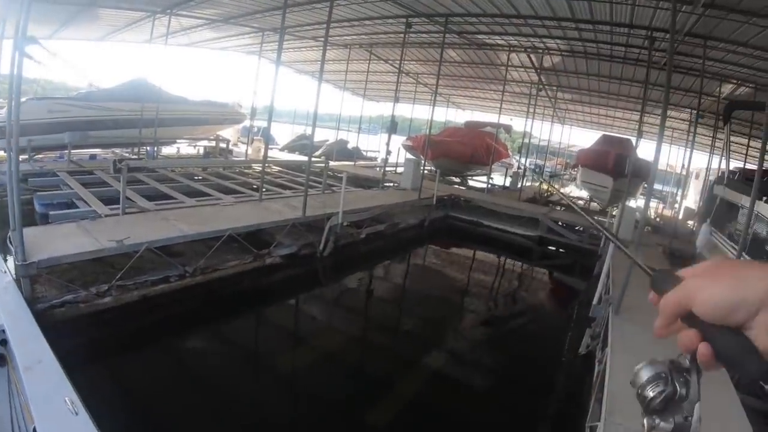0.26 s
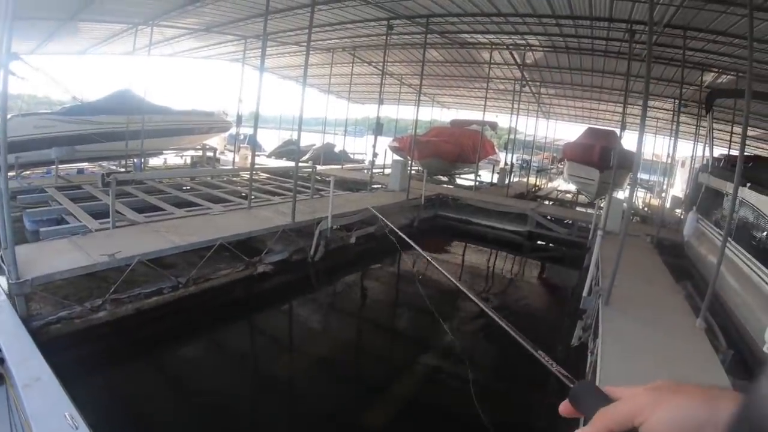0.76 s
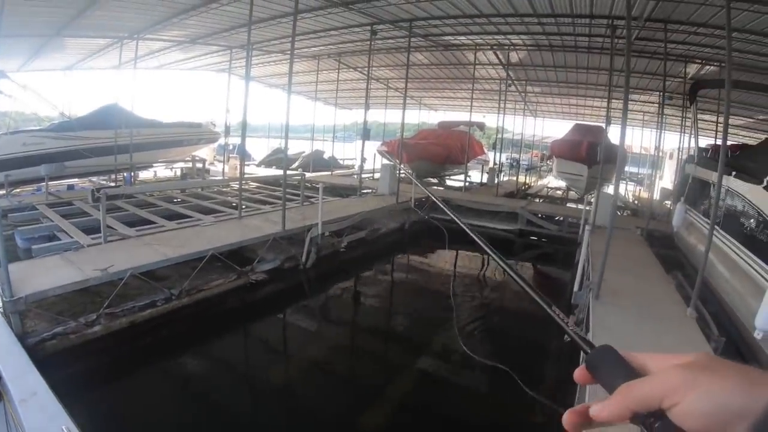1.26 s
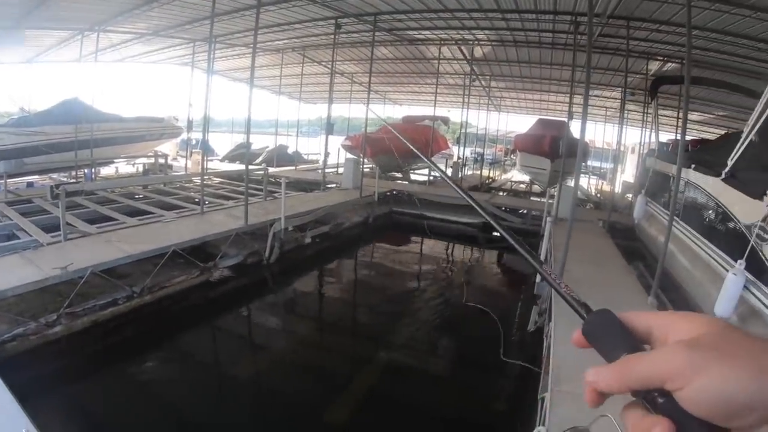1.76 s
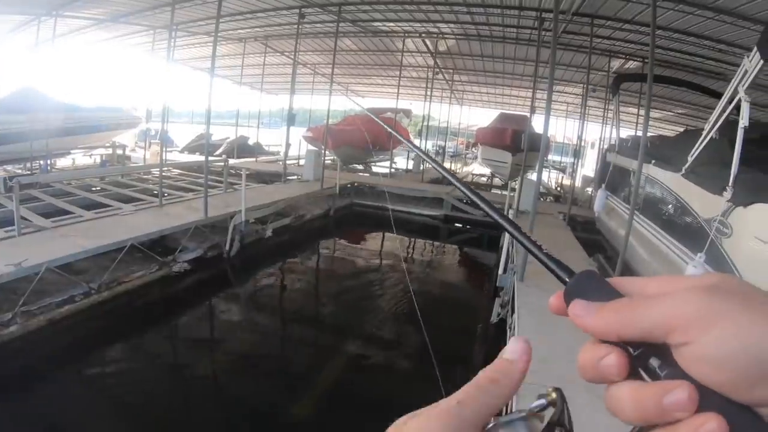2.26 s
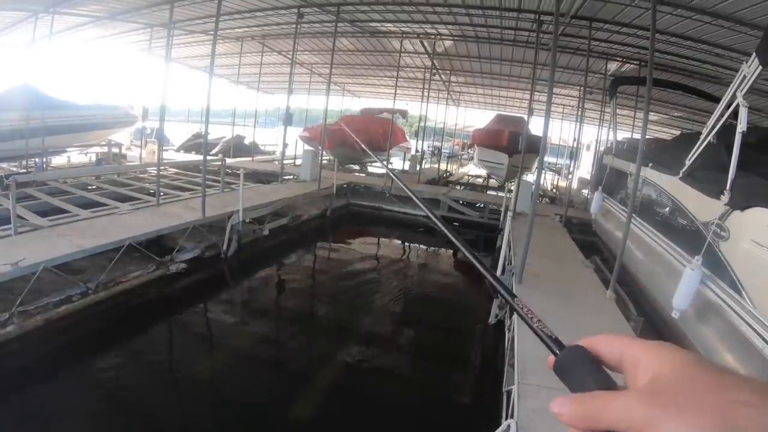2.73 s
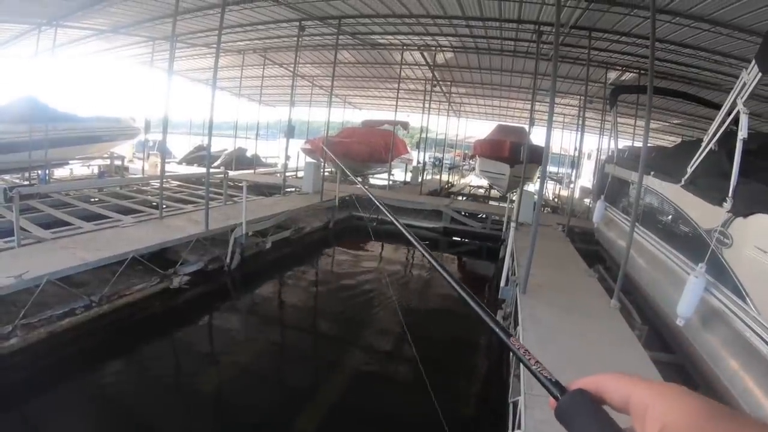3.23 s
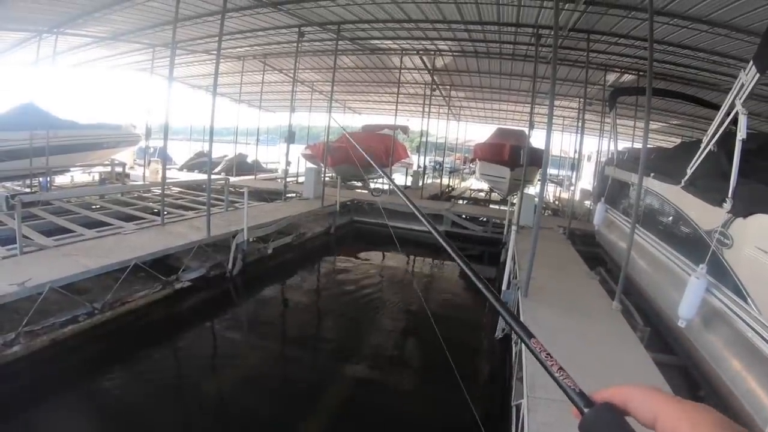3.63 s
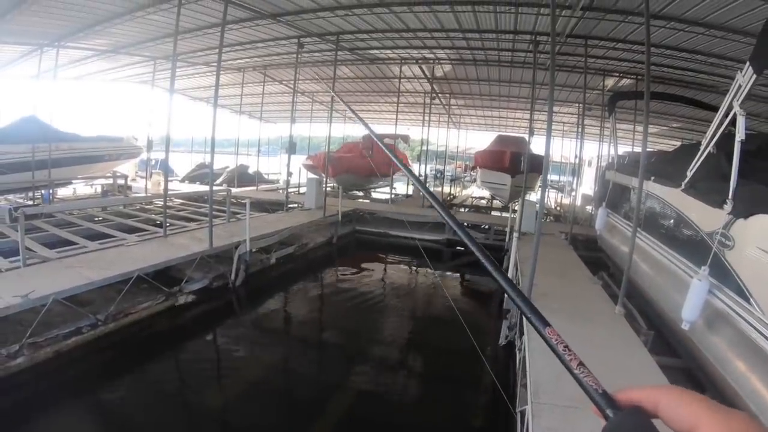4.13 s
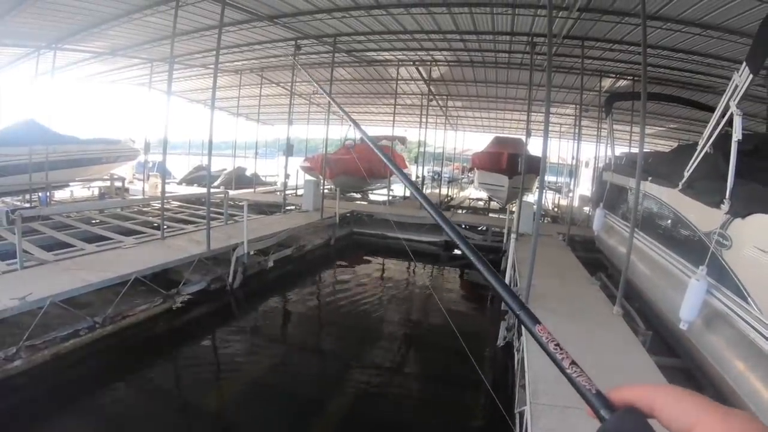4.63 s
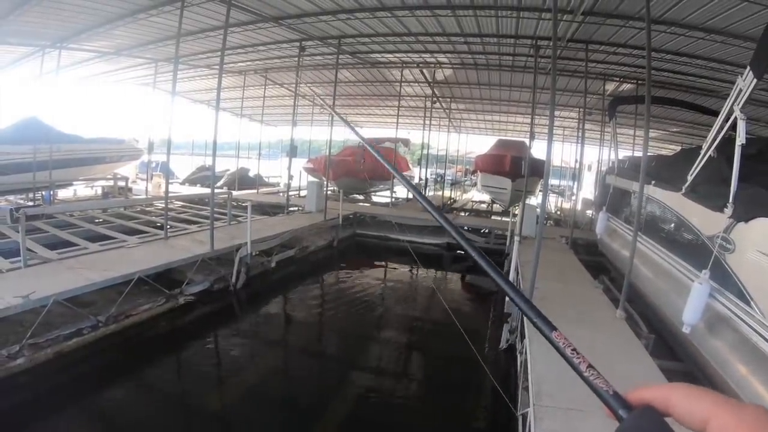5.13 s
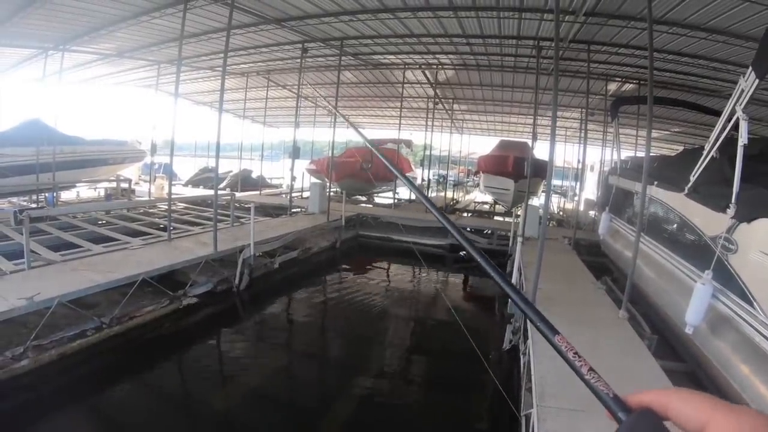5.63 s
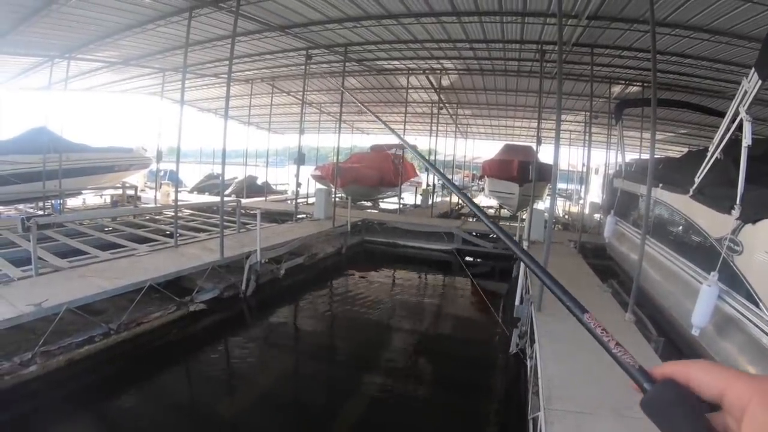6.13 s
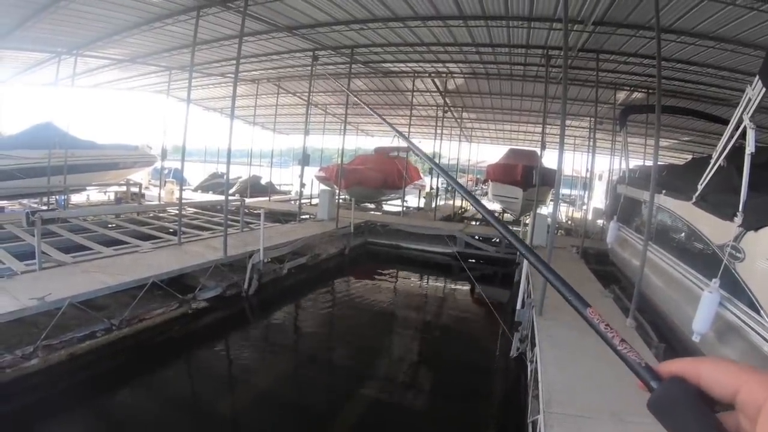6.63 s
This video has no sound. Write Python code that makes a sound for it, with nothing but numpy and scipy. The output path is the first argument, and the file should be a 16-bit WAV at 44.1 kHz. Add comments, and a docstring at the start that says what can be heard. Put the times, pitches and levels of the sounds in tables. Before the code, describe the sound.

Close handling of a fishing rod at a covered boat dock: scattered case knocks and cloth hiss, near-quiet murmur, sudden clatter, then metallic bail clack and brief whirr.

```python
"""An angler handles a spinning rod under the metal roof of a boat dock, with the camera worn on the chest.
A low murmur of the marina, coloured noise, runs throughout; faint high whistles, wavering tones, come and go.
Early on the grip creaks, a falling resonance; knocks ring the case in modes; low thumps and lurches rumble.
Sleeve and arm rub over the case as hissing noise in between, and a flurry of knocks follows past five seconds.
After some dull rubbing, coloured noise, the reel's bail scrapes and snaps shut in ringing modes and the crank whirrs."""
import sys
import numpy as np
from scipy import signal
from scipy.fft import rfft, irfft
from scipy.io import wavfile

SR = 44100
rng = np.random.default_rng(int(sys.argv[2]) if len(sys.argv) > 2 else 0)


def generate_wav(sig):
    """Save sig (samples, or channels by samples) to the path in sys.argv[1] as 16-bit PCM at SR."""
    pcm = np.round(np.clip(np.atleast_2d(sig).T, -1, 1) * 32767).astype(np.int16)
    wavfile.write(sys.argv[1], SR, pcm)


N = 303849
TIME = np.arange(N) / SR  # s
AFTER = np.arange(12000) / SR  # s since a blow

# Modes of the camera case: the mount's flex, five of the walls, two of the frame.
# Each row: frequency in Hz, relative level in dB, t60 in s at looseness 1; each blow varies them a little.
CASE_MODES = [(291, -11.5, 0.009), (1003, -3.5, 0.015), (1184, -6, 0.018), (1340, 0.5, 0.022),
              (1584, -5.5, 0.018), (1838, -11, 0.021), (2245, 19.5, 0.011), (2433, -7.5, 0.025)]
# harder contacts are brighter: the treble starts here, and this level leaves a sleeve stroke's treble as it is
BRIGHT_HZ, BRIGHT_PIVOT_DB = 4900, -34
TICK_TOP_HZ = 3100  # low-pass of the case's ticks and its singing wall
SWISH_RISE_DB_PER_S, SWISH_FALL_DB_PER_S = 748.5, 2998


def gain_of(db):
    """Decibels to amplitude."""
    return 10 ** (np.asarray(db) / 20)


def evened(x):
    """Scales to an rms of 1."""
    return x / np.sqrt(np.mean(x ** 2) + 1e-20)


def struck(x, db):
    """Sets the rms level of the first 8 ms of a blow."""
    return gain_of(db) * x / np.sqrt(np.mean(x[:, :353] ** 2) + 1e-20)


def read(points, hz):
    """Reads a spectrum on a log-frequency axis."""
    f, value = np.transpose(points)
    return np.interp(np.log(hz + 1), np.log(f + 1), value)


def add(mix, s, sound):
    """Mixes a stereo sound in at time s."""
    part = mix[:, max(round(s * SR), 0):][:, :sound.shape[1]]
    part += sound[:, :part.shape[1]]


def sides(pan_db):
    """Left and right gains of constant power; positive leans left."""
    return evened(gain_of(np.array([[pan_db], [-pan_db]]) / 2))


def wander(rate_hz):
    """Slow random motion of rms 1: noise with little above rate_hz."""
    hz = np.fft.rfftfreq(N, 1 / SR)
    spectrum = rfft(rng.standard_normal(N)) / (1 + (hz / rate_hz) ** 4)
    return evened(irfft(spectrum, N))


def lumps(rate_hz, depth_db):
    """An uneven gain that never strays more than depth_db from 0 dB."""
    return gain_of(depth_db * np.tanh(wander(rate_hz)))


def coloured(x, colour):
    """Gives a stereo excitation a spectrum, at rms 1."""
    size = x.shape[1]
    colour_gain = gain_of(read(colour, np.fft.rfftfreq(size, 1 / SR)))
    return evened(irfft(rfft(x) * colour_gain, size))


def pair(likeness, size=N):
    """White noise at the two microphone ports; a negative likeness moves them against each other."""
    a, b = rng.standard_normal((2, size))
    c = np.clip(likeness, -1, 1)
    return np.array([a, c * a + np.sqrt(1 - c * c) * b])


def highpassed(x, hz):
    """Removes what lies under an object's lowest mode."""
    return signal.sosfilt(signal.butter(2, hz, "high", fs=SR, output="sos"), x)


def brightened(x, force):
    """Harder contacts carry more treble: force is its gain."""
    treble = signal.sosfiltfilt(signal.butter(2, BRIGHT_HZ, "high", fs=SR, output="sos"), x)
    return x + treble * (force - 1)


def stroke(start, length, db, rise, fall, swell=0):
    """Gain over time of one movement: it rises, holds or swells, and falls, each at its own dB per second."""
    end = start + length
    held = db + swell * (np.clip(TIME, start, end) - (start + end) / 2)
    rising = rise * np.maximum(start - TIME, 0)
    falling = fall * np.maximum(TIME - end, 0)
    return gain_of(np.maximum(held - rising - falling, -140))


def strokes(rows, rise, fall):
    """Gain over time of a series of movements; the strongest leads."""
    return np.max([stroke(start, length, db, rise, fall, *swell) for start, length, db, *swell in rows], axis=0)


def resonate(x, hz, width_hz):
    """A resonance that may glide: shifts hz down to zero, smooths, and shifts back."""
    turn = np.exp(2j * np.pi * np.cumsum(hz * np.ones(N)) / SR)
    r = np.exp(-np.pi * width_hz / SR)
    return evened((turn * signal.lfilter([1 - r], [1, -r], x / turn)).real)


def ring(modes, hold, detune=0.06):
    """Damped modes, a little different at each point of contact; hold multiplies their ring times."""
    out = np.zeros(len(AFTER))
    for (hz, db, t60), (shift, size) in zip(modes, rng.standard_normal((len(modes), 2))):
        decay = gain_of(db + 2.9 * size - 60 * AFTER / (t60 * hold))
        out += decay * np.sin(2 * np.pi * hz * (1 + detune * shift) * AFTER)
    return out * (1 - np.exp(-AFTER / 0.00018))


def favouring(modes, favoured_hz, fall_db):
    """Modes weaken by fall_db with each octave away from the one that the contact favours."""
    return [(hz, db - fall_db * abs(np.log2(hz / favoured_hz)), t60) for hz, db, t60 in modes]


def crack(t60, likeness):
    """The bright, fast-dying noise of the contact itself."""
    # Each row: frequency in Hz, relative level in dB of the crack's spectrum.
    crack_colour = [(500, -14.5), (2500, -1), (4000, 6), (5000, -1), (6400, -2.5), (8300, -19.5),
                    (10000, -14), (12000, -32), (15000, -37)]
    noise = coloured(pair(likeness, size=len(AFTER)), crack_colour)
    return noise * np.exp(-np.log(1000) * AFTER / t60) * (1 - np.exp(-AFTER / .0001))


def chatter(s, sound, grit, spread_s, lead):
    """The main contact sits in a cloud of tiny ones, built up over lead times its spread; gives start and sound."""
    t = np.arange(-SR // 100, SR // 50) / SR
    cloud = np.exp(-np.maximum(t, -t / lead) / spread_s)
    contacts = (t == 0) + grit * rng.standard_normal(len(t)) * cloud
    return s + t[0], signal.fftconvolve(sound, contacts[None], axes=1)


def through_case(x, size=3):
    """The flexing case drives the two ports against each other, the left a few samples later."""
    return np.array([np.pad(x, (size, 0))[:len(x)], -x])


def right_shifted(x, count=10):
    """Shifts the right side's noise by a few samples."""
    return np.array([x[0], np.roll(x[1], count)])


def wall_ring(favoured_hz, hold):
    """The walls ring and the mount flexes beneath them."""
    walls = ring(favouring(CASE_MODES[1:6], favoured_hz, fall_db=18.0), hold)
    return through_case(walls) + ring(CASE_MODES[:1], hold) * sides(-21)


def frame_ring(hold):
    """The stiffer frame rings above the walls."""
    return through_case(highpassed(ring(CASE_MODES[6:], hold, detune=.025), hz=1110))


def marina():
    """A steady, gently swelling murmur: coloured noise under a slow random gain."""
    # Each row: frequency in Hz, relative level in dB of the murmur's spectrum.
    marina_colour = [(18, -33), (30, 2), (105, -8.5), (195, -2), (437, -14), (511, -24.5), (837, -29),
                     (1340, -23), (2080, -38.5), (2770, -27.5), (4420, -35.5), (6700, -43), (15000, -57.5)]
    return gain_of(-58.5) * coloured(pair(0.65) * gain_of(1.0 * wander(6.9)), marina_colour)


def whistles():
    """Separate tones, some thin and some airy, that waver, swell and fade: narrow noise on a gliding pitch."""
    # Each row: start in s, length in s, starting Hz, final Hz, noise cutoff either side in Hz,
    # level in dB before a 3 dB cut, the fade and the spill between sides.
    whistle_rows = [(0, 0.54, 2400, 2470, 45, -66), (0.303, 0.1, 2910, 3050, 25, -61.5),
                    (2.585, 0.23, 2700, 2640, 49.7, -79), (2.87, 0.17, 2730, 2640, 70, -74),
                    (3.236, 0.44, 3190, 3540, 120, -70), (3.501, 0.883, 2523, 2486, 160, -65),
                    (3.919, 0.58, 2523, 2660, 170, -65), (4.662, 0.31, 3110, 3110, 40, -64.5)]
    out = np.zeros((2, N))
    flutter = gain_of(1.34 * wander(6.5))
    waver = 1 + 0.005 * wander(12)
    for s, length, first_hz, last_hz, width_hz, db in whistle_rows:
        start, size = max(round(s * SR), 0), round(length * SR)
        noise = rng.standard_normal((2, SR)) + 1j * rng.standard_normal((2, SR))
        fuzz = signal.sosfilt(signal.butter(2, width_hz, fs=SR, output="sos"), noise)[:, :size]
        hz = np.linspace(first_hz, last_hz, size) * waver[start:][:size]
        carrier = np.exp(2j * np.pi * np.cumsum(hz) / SR)
        tone = evened((fuzz * carrier).real * flutter[start:][:size])
        add(out, s, gain_of(db - 3.0) * tone * signal.windows.tukey(size, .9))
    return out + 0.29 * out[::-1]  # each side spills into the other


def roof(x):
    """A thin tail from the metal roof: noise that starts after 14 ms, each band dying at its own speed."""
    # Each row: frequency in Hz, t60 of the roof's tail in s.
    roof_decay = [(200, 0.55), (2400, 1), (12000, 0.33)]
    noise = rng.standard_normal((2, SR)) * (np.arange(SR) > .014 * SR)
    hz, t, z = signal.stft(noise, SR, nperseg=256)
    decay = np.exp(-np.log(1000) * t / read(roof_decay, hz)[:, None])
    tail = signal.istft(z * decay, SR, nperseg=256)[1]
    return signal.fftconvolve(x, tail / np.linalg.norm(tail[0]), axes=1)[:, :N]


def shake():
    """Lumpy rumble from each lurch of the body, mostly to the right; clothing rustles more evenly with it."""
    # Lurches that shake the camera. Each row: start in s, length in s, level in dB, left-right balance in dB.
    lurch_rows = [(0, 0.24, -36, -2), (0.464, 0.092, -35.5, 13), (0.715, 0.25, -38.5, -2),
                  (1.068, 0.08, -46.5, 1), (1.79, 0.38, -53, -3.5), (2.354, 0.11, -43, -3),
                  (3.117, 0.19, -44.5, -6), (3.857, 0.46, -51, 4), (5.431, 0.23, -33.5, -8)]
    # Spectra of the camera's rumble and the clothing's rustle. Each row: frequency in Hz, relative level in dB.
    rumble_colour = [(15, -7.5), (28, 2.5), (85, -5.5), (130, -12.5), (250, -44.5), (600, -80.5)]
    rustle_colour = [(60, -12), (120, 3.5), (250, -1.5), (350, -16.5), (500, -14), (900, -31.5),
                     (2000, -80)]
    rise_db_per_s, fall_db_per_s, rest_db = 256.5, 211, -58
    lurches = [stroke(s, length, db, rise_db_per_s, fall_db_per_s) * sides(pan_db)
               for s, length, db, pan_db in lurch_rows]
    motion = np.max(lurches, axis=0) + gain_of(rest_db)
    rumble = coloured(pair(0.69) * lumps(9.4, depth_db=5.5), rumble_colour) * motion
    rustle = coloured(pair(0.17) * lumps(14.0, depth_db=8.0), rustle_colour) * motion ** 0.52 * sides(-1.8)
    return rumble + gain_of(-29.5) * rustle


def cloth():
    """Threads catch and slip over the case, hissing and setting its wall singing; harder strokes are brighter."""
    # Strokes of the sleeve on the case. Each row: start in s, length in s, level in dB before brightening.
    sleeve_rows = [(0, 0.12, -56), (.5, .06, -59.5), (.57, 0.12, -51), (.73, 0.091, -48.5),
                   (.89, 0.12, -55.5), (1.05, 0.057, -60.5), (1.165, 0.029, -55), (1.355, 0.035, -49.5),
                   (1.45, 0.096, -61.5), (1.7, 0.11, -64), (1.938, .158, -39.5), (2.155, 0.024, -57),
                   (2.26, 0.13, -65.5), (2.5, 0.97, -77.5), (3.14, 0.059, -64), (3.59, 0.073, -55.5),
                   (3.7, 0.16, -65), (4.37, .24, -70.5), (4.68, 0.284, -73), (5.13, 0.095, -63.5)]
    # Quick, bright swishes. Each row: start in s, length in s, level in dB halfway, swell in dB per s.
    swish_rows = [(1.66, 0.11, -58.5, -12), (5.399, 0.046, -26, 103), (5.46, 0.059, -41.5, 102)]
    # Spectra of the sleeve's hiss and of a swish. Each row: frequency in Hz, relative level in dB.
    sleeve_colour = [(180, -42), (300, -6), (884, -15.5), (1480, -3), (2700, -10), (3400, -14.5),
                     (4540, -13.5), (5350, -17.5), (5950, -4), (7000, -7), (8350, -21.5), (9300, -15),
                     (10200, -16), (11400, -40), (14300, -32), (15000, -60)]
    swish_colour = [(470, -20), (800, -19), (1450, -8.5), (2240, -14), (5100, -17.5), (6400, -4.5),
                    (7650, -4.5), (8450, -20), (9400, -14), (15400, -42.5)]
    rest_db = -75  # the sleeve never quite stops
    treble_db_per_db = 0.19  # extra treble per dB of stroke level over the pivot
    effort = strokes(sleeve_rows, rise=506, fall=600) + gain_of(rest_db)
    sweep = strokes(swish_rows, SWISH_RISE_DB_PER_S, SWISH_FALL_DB_PER_S)
    slips = gain_of(1.5 * wander(250) + 2.0 * wander(18))
    sleeve = coloured(right_shifted(pair(0.02)) * slips, sleeve_colour)
    sleeve = brightened(sleeve, (effort / gain_of(BRIGHT_PIVOT_DB)) ** treble_db_per_db)
    swish = coloured(pair(0) * gain_of(1.3 * wander(400)), swish_colour)
    wall = through_case(resonate(rng.standard_normal(N), hz=1428, width_hz=140))
    wall = signal.sosfilt(signal.butter(2, TICK_TOP_HZ, fs=SR, output="sos"), wall)
    return (sleeve + gain_of(-1.5) * wall) * effort + (swish + gain_of(-7.5) * wall) * sweep


def thumps():
    """Low thumps, from soft pushes and from the mount ringing under hard knocks: damped sines that fall in pitch."""
    # Each row: start in s, peak level in dB before panning, nominal Hz (it falls from 1.32 to 0.78 times this),
    # t60 in s (longer ones start more gently), left-right balance in dB.
    thump_rows = [(0.778, -14, 143, 0.01, -11), (1.445, -25.5, 59.6, 0.2, -8),
                  (1.45, -27.5, 217, 0.049, -7.5), (2.340, -25.5, 108, 0.029, -9),
                  (3.171, -28, 122, 0.065, -7.5), (5.335, -19.5, 41.3, 0.21, -4),
                  (5.517, -9, 95.5, 0.053, -11), (5.551, -19, 250, 0.066, -9),
                  (5.596, -16.5, 132, 0.14, -1.5), (5.642, -23, 305.5, 0.092, -14),
                  (6.157, -15.5, 142, 0.031, -10), (6.178, -6.5, 103, 0.031, -2)]
    port_phases = np.array([[2.2], [0]])  # rad
    out = np.zeros((2, N))
    for s, db, hz, t60, pan_db in thump_rows:
        turns = np.cumsum(hz * (0.778 + 0.54 * np.exp(-AFTER / 0.0039))) / SR
        envelope = (1 - np.exp(-AFTER / (0.019 * t60))) ** 2 * np.exp(-np.log(1000) * AFTER / t60)
        tone = np.sin(2 * np.pi * turns + port_phases)
        add(out, s, gain_of(db) * sides(pan_db) * tone * envelope / envelope.max())
    return out


def creak():
    """The grip twists in the hand with a short creak that falls in pitch: noise in a gliding double resonance."""
    start_s, length_s, width_hz, level_db = 0.094, 0.018, 280, -35.5
    overtone_ratio, overtone_db = 1.7, -5
    hz = np.interp(TIME, [start_s, start_s + length_s], (1170, 700))
    slips = rng.standard_normal(N)
    low, high = (resonate(resonate(slips, f, width_hz), f, width_hz) for f in (hz, hz * overtone_ratio))
    twist = stroke(start_s, length_s, level_db, SWISH_FALL_DB_PER_S, SWISH_FALL_DB_PER_S)
    return evened(low + gain_of(overtone_db) * high) * twist * sides(-10)


def dull_rubbing():
    """Dull rubbing: low body under the cloth swish, then before the reel moves; coloured noise, unsteady in level."""
    # Each row: start in s, length in s, level in dB halfway, swell in dB per s if it builds.
    rub_rows = [(5.405, 0.048, -43), (5.74, 0.28, -57), (6, 0.12, -48, 43.5)]
    # Each row: frequency in Hz, relative level in dB of the rubbing's spectrum.
    rub_colour = [(120, -13.5), (280, 4), (390, -10.5), (540, -9.5), (900, -22.5), (2000, -20.5),
                  (2650, -16.5), (3400, -30), (4150, -20.5), (4900, -32), (6500, -32), (12000, -49.5)]
    rub = coloured(pair(0.94) * gain_of(2.6 * wander(120)), rub_colour)
    return rub * strokes(rub_rows, rise=250, fall=400)


def ticks():
    """Short gritty knocks on the same case, faint to fairly strong, without a crack."""
    # Each row: time in s, wall ring in dB, frame ring in dB, both before the treble cut and a 3.5 dB cut.
    tick_rows = [(.199, -43, -50), (0.225, -45, -48.5), (0.261, -46, -54), (0.271, -41.5, -53),
                 (0.293, -44.5, -55), (0.882, -44.5, -64), (.909, -39.5, -57), (.941, -42.5, -41),
                 (.984, -46, -64), (3.159, -50.5, -57), (5.346, -40.5, -49.5), (5.385, -43, -40),
                 (5.5495, -27, -26.5), (5.567, -50, -43.5), (5.588, -26.5, -49.5), (5.666, -39, -37.5),
                 (5.763, -49, -64), (5.8273, -51.5, -43.5), (5.843, -57, -50.5), (5.920, -59, -53)]
    out = np.zeros((2, N))
    for s, wall_db, frame_db in tick_rows:
        wall = struck(wall_ring(favoured_hz=1340, hold=0.74), wall_db)
        tick = wall + struck(frame_ring(hold=0.89), frame_db)
        add(out, *chatter(s, tick * sides(-4.5), grit=0.076, spread_s=0.012, lead=0.14))
    return gain_of(-3.5) * signal.sosfilt(signal.butter(3, TICK_TOP_HZ, fs=SR, output="sos"), out)


def case_knocks():
    """Each knock rings walls, frame and rim and gives a short crack; its rebound rings only the walls."""
    # Each row: time in s, wall ring in dB, frame ring in dB, crack in dB before a 5 dB cut and brightening,
    # wall Hz that the point of contact favours, looseness as a factor on ring time,
    # left-right balance of the treble in dB (the walls take 0.66 of it).
    knock_rows = [(0.0356, -47, -45, -56, 1640, 0.57, -4), (0.092, -28, -37.5, -58, 1000, 1.5, -4),
                  (0.5996, -23.5, -27, -46, 1480, 0.78, -1.5), (0.6624, -18, -28.5, -33.5, 1400, 0.77, 1),
                  (0.7775, -28.5, -47, -59, 1600, 0.82, -8), (0.9256, -45, -35, -42, 1510, 1.35, -9),
                  (2.34, -26.5, -32, -38, 1620, 0.87, -4.5), (2.3549, -39, -39, -35.5, 1230, 2, -3),
                  (2.4605, -39.5, -34, -47.5, 1260, 1, -18), (2.5922, -58.5, -72, -51, 1020, 1.95, -16),
                  (2.99, -65, -56, -52.5, 1420, 0.12, -5), (5.3712, -33, -27, -44.5, 1410, 1.7, -8),
                  (5.447, -13.5, -29.5, -31, 1690, 1.32, 7), (5.5518, -19, -25.5, -28, 1340, 1.37, -3.5),
                  (5.594, -22, -21.5, -25, 1390, 0.89, -8), (5.6211, -22, -28.5, -26.5, 1380, 1.7, -7),
                  (5.643, -18, -31.5, -30, 1360, 1.48, -1), (5.68, -25, -37, -47.5, 1360, 1.55, -5)]
    # High modes of the case's rim. Each row: frequency in Hz, relative level in dB, t60 in s at looseness 1.
    rim_modes = [(3670, -9, 0.017), (3670, 12, 0.0097), (5840, 4, 0.02), (6230, -10, 0.012)]
    rim_hz, rim_db = 5300, -14  # favoured at looseness 1 (looser is lower); level against the crack column
    # a loose contact rebounds harder: delay, level against the wall at looseness 1, dB per doubling of looseness
    rebound_s, rebound_at_1_db, rebound_db_per_doubling = 0.0041, -9.5, 11.5
    out = np.zeros((2, N))
    for s, wall_db, frame_db, crack_db, favoured_hz, hold, pan_db in knock_rows:
        favoured_rim = favouring(rim_modes, rim_hz / hold, fall_db=13.0)
        rim = highpassed(ring(favoured_rim, hold, detune=0.018), hz=3040)[None]
        force = gain_of(crack_db - BRIGHT_PIVOT_DB) ** 0.46 + 0.5
        snap = brightened(struck(crack(0.011 * hold, likeness=0), crack_db - 5.0), force)
        treble = struck(frame_ring(hold), frame_db) + struck(rim, crack_db + rim_db) + snap
        wall_sides = sides(0.66 * pan_db)
        knock = struck(wall_ring(favoured_hz, hold), wall_db) * wall_sides + treble * sides(pan_db)
        add(out, *chatter(s, knock, grit=0.013, spread_s=0.0092, lead=0.2 * hold ** 2))
        rebound_db = wall_db + rebound_at_1_db + rebound_db_per_doubling * np.log2(hold)
        add(out, s + rebound_s, struck(wall_ring(favoured_hz, hold), rebound_db) * wall_sides)
    return out


def reel():
    """The bail scrapes, chatters and snaps shut; the gears whirr and the crank knocks, as noise and damped modes."""
    # The bail scrapes over its trip. Each row: start in s, length in s, level in dB.
    scrape_rows = [(6.145, 0.017, -23.5)]
    # Turns of the handle, the first growing louder and the second fading.
    # Each row: start in s, length in s, level in dB halfway, swell in dB per s.
    gear_rows = [(6.24, 0.348, -58, 60), (6.69, 0.2, -67, -46)]
    # Spectra of the bail's scrape and the gears' whirr. Each row: frequency in Hz, relative level in dB.
    scrape_colour = [(120, -28.5), (170, -1), (440, -11.5), (550, 3), (671, -14), (900, -8), (2000, -16.5),
                     (2700, -10.5), (3100, -23), (4150, -19.5), (4900, -22.5), (5700, -15), (6500, -32.5),
                     (9720, -31), (15000, -70.5)]
    gear_colour = [(280, -32), (480, -11), (574, -0.5), (845, -20.5), (1660, -2), (2280, -4.5),
                   (2590, -16.5), (3600, -8), (4680, -24.5), (9730, -27.5), (13000, -42)]
    # Clacks of the bail and the crank. Each row: time in s, body ring in dB and rotor ring in dB
    # (both before the housing muffles them), crack in dB, rotor Hz that the contact favours, factor on ring time.
    clack_rows = [(6.138, -33.5, -24.5, -29.5, 2310, 0.71), (6.148, -23.5, -25.5, -40, 1540, 1),
                  (6.156, -33, -20.5, -30.5, 2000, 0.54), (6.1767, -25.5, -24.5, -23, 2800, 0.77),
                  (6.1924, -40.5, -36.5, -40.5, 2800, 0.75), (6.404, -35, -30, -55.5, 1740, 0.47),
                  (6.570, -37.5, -34, -74.5, 1620, 0.9)]
    # Modes of the reel, three of the body and then the rotor's.
    # Each row: frequency in Hz, relative level in dB, t60 in s before the clack's factor.
    reel_modes = [(556, 18.5, 0.089), (706, 18.5, 0.026), (830, 16.5, 0.023), (1213, 17, 0.012),
                  (1528, 4.5, 0.022), (1650, 2.5, 0.017), (1884, 4, 0.017), (2130, -1.5, 0.032),
                  (2285, -6, 0.027), (2730, 2.5, 0.021)]
    # Modes of the bail wire. Each row: frequency in Hz, relative level in dB, t60 in s before a factor of 0.64.
    wire_modes = [(2800, -3, 0.026), (4060, -1.5, 0.043), (5580, -5.5, 0.029), (5630, -8, 0.077)]
    wire_db = -6  # against the crack

    scrape = coloured(pair(0.63) * gain_of(0.37 * wander(350)), scrape_colour)
    out = scrape * strokes(scrape_rows, rise=721, fall=632)
    whirr = coloured(pair(1.0) * gain_of(2.0 * wander(110)), gear_colour)
    out += whirr * strokes(gear_rows, rise=597, fall=800)
    # the greased housing muffles its own ring
    housing = signal.butter(4, [430, 3200], "bandpass", fs=SR, output="sos")
    for s, body_db, rotor_db, crack_db, favoured_hz, hold in clack_rows:
        rotor = ring(favouring(reel_modes[3:], favoured_hz, fall_db=31.0), hold, detune=.02)
        shell = ring(reel_modes[:3], hold, detune=0.004)
        body = struck(shell[None], body_db) + struck(rotor[None], rotor_db)
        add(out, *chatter(s, signal.sosfilt(housing, body), grit=0.028, spread_s=0.0056, lead=0.97))
        wire = highpassed(ring(wire_modes, hold=0.64, detune=0.0019), hz=2000)[None]
        snap = struck(crack(0.025 * hold, likeness=0.86), crack_db)
        add(out, s, snap + struck(wire, crack_db + wire_db))
    return out


def scene():
    """Sums all layers; of the handling, only the case's knocks and ticks and the reel reach the roof."""
    knocks, tackle = case_knocks() + ticks(), reel()
    near = knocks + tackle + thumps() + creak() + dull_rubbing() + cloth() + shake()
    airborne = gain_of(-37.0) * knocks + gain_of(-61.5) * tackle
    return near + marina() + whistles() + roof(airborne)


def record(dry):
    """The camera's band limit: a low-pass at 15.3 kHz."""
    low_pass = signal.firwin(511, 15300, window=("kaiser", 9), fs=SR)
    return signal.oaconvolve(dry, low_pass[None], "same")


dry = scene()
out = record(dry)
generate_wav(out)
```